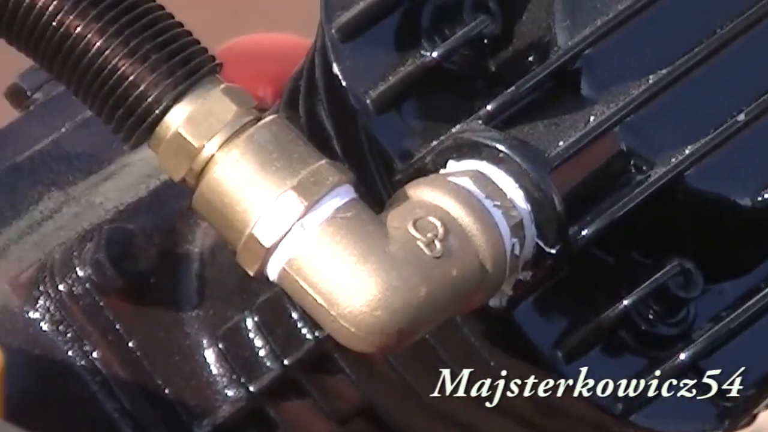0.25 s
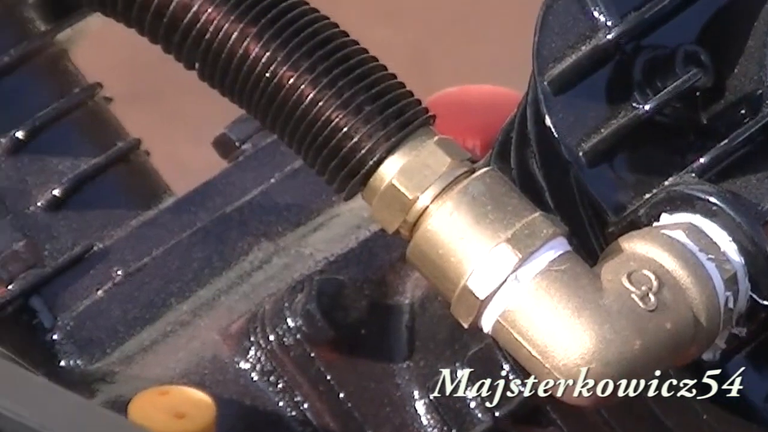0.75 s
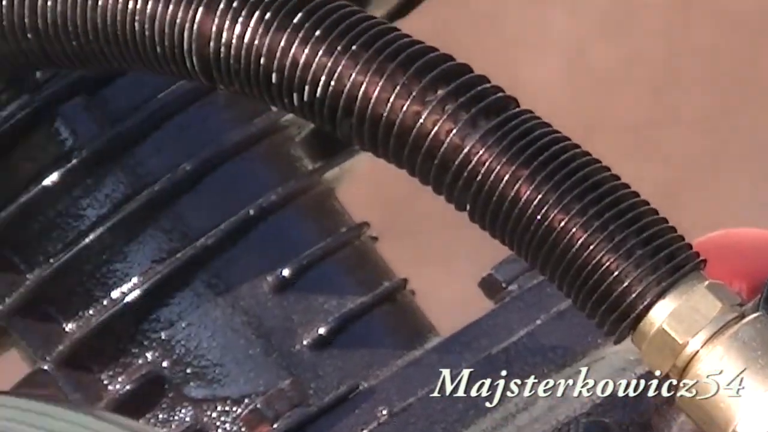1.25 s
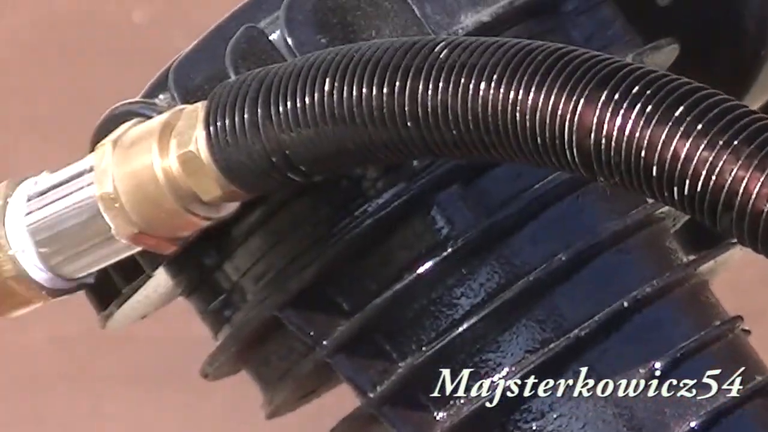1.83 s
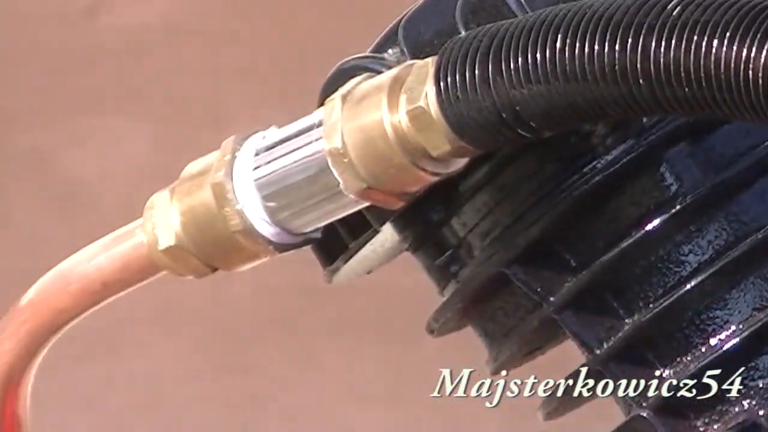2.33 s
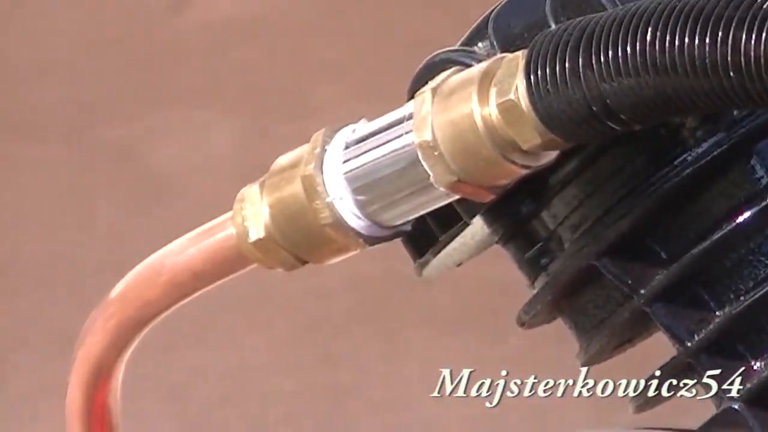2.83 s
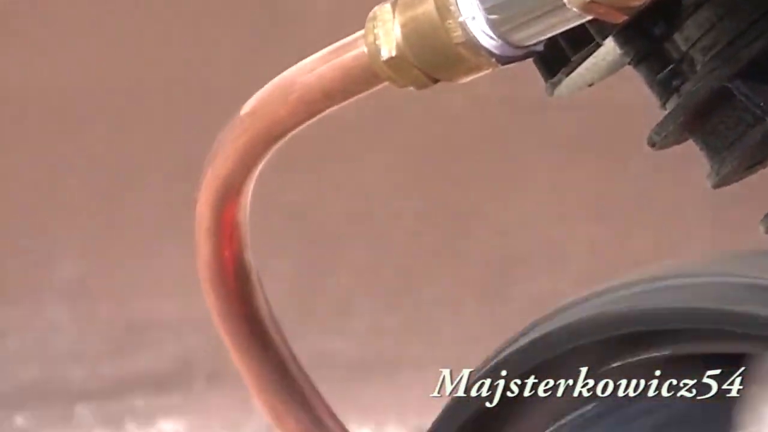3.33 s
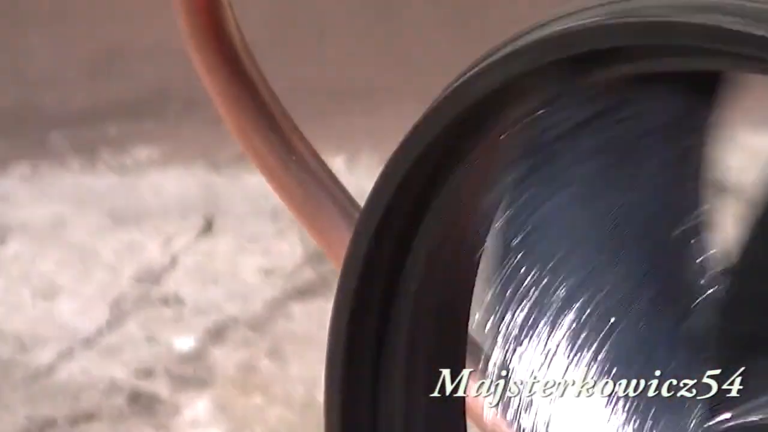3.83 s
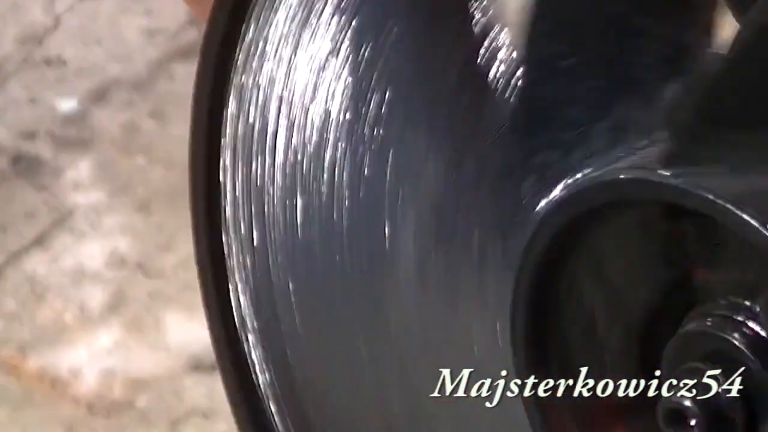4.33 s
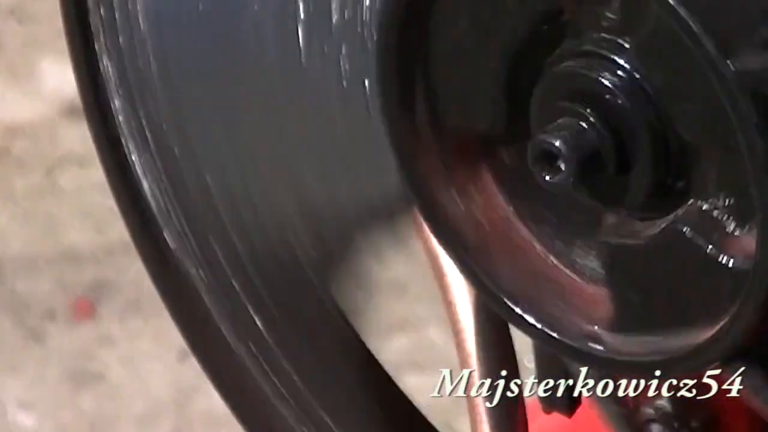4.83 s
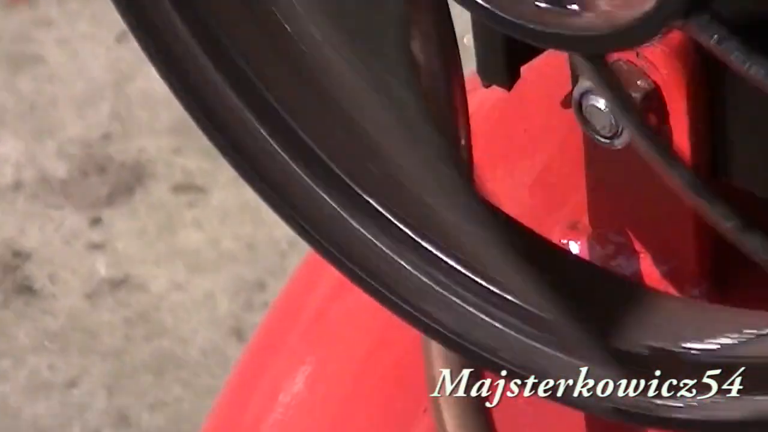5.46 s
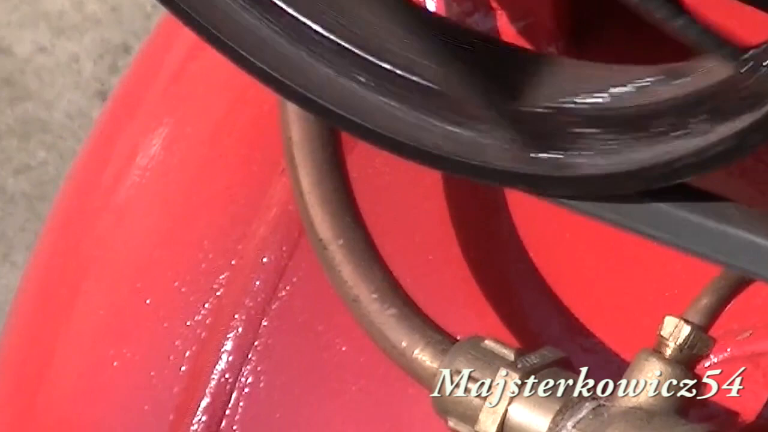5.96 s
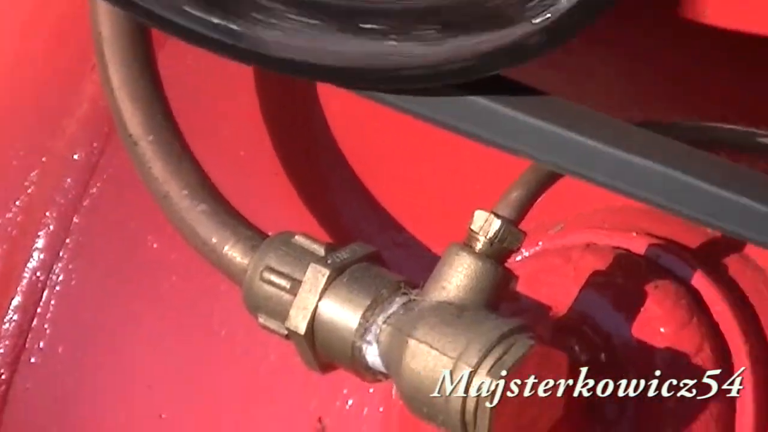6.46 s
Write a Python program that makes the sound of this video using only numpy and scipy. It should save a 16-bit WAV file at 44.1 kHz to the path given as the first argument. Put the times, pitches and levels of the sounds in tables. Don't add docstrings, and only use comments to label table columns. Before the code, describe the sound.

From 0 to about 6.7 seconds a belt-driven piston air compressor runs steadily, already at speed and never stopping. Nearly nineteen times a second the same uneven pattern recurs: clustered knocks ringing the cast body around 1 to 2 kHz, low intake thumps near 300 Hz, sharp reed ticks and snaps up near 10 kHz, and gritty puffs of air. They fuse into a rough, fast metallic rattle. Under it lie a broad fan and flywheel rush, a pulsing motor tone near 625 Hz, a low intake drone and a thin whine around 2 kHz. The first whine is strongest early, briefly thinning near 2.3, 3.9 and 5.5 seconds, as the close microphone moves from above to beside the pump, mostly between 3 and 4. Small level flinches come at 1.5, 2.1, 3.5 and 4.1-4.4 seconds. Outdoors, dry, level-controlled, slightly crunchy, dull above 12 kHz.

```python
import sys
import numpy as np
from scipy import signal
from scipy.fft import rfft, irfft, next_fast_len
from scipy.io import wavfile
from scipy.ndimage import uniform_filter1d, map_coordinates

SR = 44100
rng = np.random.default_rng(int(sys.argv[2]) if len(sys.argv) > 2 else 0)


def waveform_to_disk(signal):
    frames = np.transpose(np.atleast_2d(signal))
    scaled = np.clip(frames, -1, 1) * 32767
    samples = np.round(scaled).astype(np.int16)
    wavfile.write(sys.argv[1], SR, samples)


def invert_db(level):
    return 10 ** (np.asarray(level, dtype=float) / 20)


N = 295029

# t/s, speed/(turns per s)
CRANK_SPEED = [(0, 18.754), (.7, 18.7595), (1.5, 18.758), (3.5, 18.745), (6.7, 18.742)]
START_TURN, TURN_S = -.0154, 1 / 18.75
# t/s, position (0 above - 1 beside)
LISTENER_SIDE = [(0, 0), (1.5, 0.058), (3, 0.24), (4, 0.76), (5, 0.79), (6.7, 0.88)]

# f/Hz, level/dB
RUSH_SPECTRUM = [(15, -66), (25, -33), (160, -29.5), (296, -21.5), (459, -16.5), (564, -23), (625, -9.5),
                 (768, -14), (1190, -11), (1460, -16.5), (2100, -7.5), (5430, -20.5), (7990, -31.5),
                 (9570, -32.5), (11800, -41), (15300, -82), (22000, -120)]
# f/Hz, level/dB
SHAFT_TONES = [(417, -57.5), (437, -50), (526, -47.5), (550, -59), (573, -46.5), (598, -49), (650, -54),
               (663, -51.5), (697, -49.5), (725, -48.5)]
FAN_ORDER, FAN_DB = 33.375, -32

FIN_ORDERS = [109, 117, 103]
# level above/dB, level beside/dB, phase/rad
FIN_LEVELS = [(-38.5, -48, 3.14), (-56, -43, 1.5), (-54, -41, 1.5)]
QUIET_TIMES = [0, 2.32, 3.9, 5.55]
QUIET_S, QUIET_DB = 0.1, -12

# t into the turn/s, level/dB
INTAKE_THUMPS = [
    (0.00932, 0.9),
    (0.04947, -3.8),
    (0.0282, -12.4),
    (0.04296, -9.5),
]
# f/Hz, width/Hz, level above/dB, level beside/dB
HOUSING_MODES = [(240, 100, -9.8, -10.6), (294, 59, 0.0, -0.7), (377, 100, -3.2, -4.6)]
DRONE_ORDER = 13

# t into the turn/s, level/dB
REED_SNAPS = [
    (.0343, 1.5),
    (.0395, -9),
    (0.032, -1),
    (0.056, -6),
    (.0001, -7),
]
# t into the turn/s, level/dB
SEAT_TICKS = [(0.03308, -4.7), (0.03512, -5.6), (0.03539, -7.8), (0.03927, -7.4), (0.04321, -10.1),
              (0.04747, -2.0), (0.04878, 2.0), (0.0502, 1.2), (0.05184, -7.6), (-0.00018, -9.6),
              (0.00343, -8.3), (0.00832, -7.5)]
# t into the turn/s, level/dB
REED_OPENINGS = [(.0338, -10), (.0398, -9), (.0476, -2), (.0490, .5), (.0503, 1), (.0517, -3), (.0003, -4),
                 (.0036, -3), (.0078, -5), (.0120, -6), (.0165, -6), (.0202, -4)]
# f/Hz, width/Hz, level/dB
PLATE_MODES = [(6688, 45, -3), (7335, 140, -13), (8104, 56, -9), (8612, 56, -8), (8737, 120, -11),
               (9321, 80, -11), (9480, 30, -5), (9621, 80, -12), (9711, 35, 0), (9830, 50, -20),
               (9975, 28, -22), (10229, 165, -14)]
# f/Hz, width/Hz, level/dB
HEAD_MODES = [(2565, 50, -5), (2862, 60, -1.5), (3040, 55, -5), (3445, 60, -5), (3600, 130, -7),
              (3950, 90, -12), (4425, 120, -9), (4820, 100, -10), (5420, 280, -9)]
# f/Hz, level/dB
PUFF_SPECTRUM = [(880, -31), (1500, 8), (2120, -25), (2410, -19), (2940, 3), (3940, -5), (5420, -5.5),
                 (7840, -14.5), (9650, -19.5), (11800, -28), (15300, -69), (22000, -120)]

# t into the turn/s, level/dB
BODY_KNOCKS = [(0.00139, 2.4), (0.00483, 1.0), (0.00696, -0.0), (0.01103, -13.4), (0.01358, -18.0),
               (0.0168, -18.0), (0.02197, -6.7), (0.026, -2.4), (0.03288, -7.5), (0.03673, -2.1),
               (0.04054, -2.0), (0.04519, 2.8), (0.04856, -7.9)]
# f/Hz, width/Hz, level above/dB, level beside/dB
BODY_MODES = [(502, 10, -12.2, -10.9), (645, 37, -10.3, -10.5), (857, 66, -15.8, -18.1),
              (935, 30, -16.6, -17.7), (995, 11, -0.9, -8), (1034, 21, -6.1, -10.6), (1152, 27, -4.8, -4.4),
              (1198, 11, -0.4, -1.6), (1315, 45, -11.1, -11.9), (1363, 15, -0.6, 0.0),
              (1421, 24, -13.7, -18.1), (1507, 50, -16.4, -14.4), (1636, 18, -4.4, -5.0),
              (1814, 21, -14.1, -13.0), (1882, 30, -11.8, -10.6), (1947, 32, -13.6, -11.6),
              (1975, 13, -21.3, -15.6), (2038, 10, -12, -14), (2201, 28, -7.6, -6.5),
              (2277, 21, -12.6, -11.2), (2361, 11, -14.2, -13.9)]
# f/Hz, width/Hz, level/dB
FRAME_MODES = [(511.6, 22, -7.5), (634, 40, -7.5), (1002, 90, -9.5), (1135, 143, -7), (1380, 41, -2),
               (1650, 87, -8), (1862, 45, -3), (2044, 11.5, -3.5), (2210, 15, -12.5)]

# f/Hz, level under the mean/dB
TREBLE_GATE = [(7000, -8), (8300, -4.5), (9000, -5), (9400, -11), (10200, -6.5), (10700, -.5), (11000, 0),
               (11250, -2), (11600, 0), (11900, 2.5)]
# t/s, level/dB
LOUDNESS = [(0, -20), (1.3, -20.5), (2.2, -21), (3, -20), (3.6, -21.5), (4.4, -21.5), (5.2, -20.5),
            (6.7, -20.5)]
# t/s, level/dB
GAIN_DIPS = [
    (1.49, -2),
    (2.08, -2),
    (2.45, -1),
    (3.45, -1.5),
    (4.11, -2.5),
    (4.41, -2),
    (4.8, -1),
]
DIP_FALL_S, DIP_RISE_S = 0.015, 0.038
CEILING = .47


def unit(x):
    return x / np.sqrt(np.mean(x ** 2) + 1e-20)


def curves(rows):
    s, *cols = np.transpose(rows)
    return [np.interp(np.arange(N) / SR, s, c) for c in cols]


def wobble(rate):
    knots = rng.standard_normal(int(N * rate / SR) + 4)
    return map_coordinates(knots, [np.arange(N) * rate / SR])


def dips(rows, fall_s, rise_s):
    rows = np.array(rows)
    since = np.arange(N) / SR - rows[:, :1]
    width_s = np.where(since < 0, fall_s, rise_s)
    return rows[:, 1] @ np.exp(-(since / width_s) ** 2)


def filtered(x, response):
    m = next_fast_len(N + SR // 2)
    hz = np.fft.rfftfreq(m, 1 / SR) + 1e-3
    return irfft(rfft(x, m) * response(hz), m)[:N]


def band(x, low_hz, high_hz):
    return filtered(x, lambda f: 1 / (1 + (low_hz / f) ** 12) / (1 + (f / high_hz) ** 12))


def coloured(x, points):
    hz, db = np.transpose(points)
    return unit(filtered(x, lambda f: invert_db(np.interp(np.log(f), np.log(hz), db))))


def rung(x, modes):
    def response(f):
        total = 0
        for k, (centre, width, db) in enumerate(modes):
            resonance = 1j * f * width / (centre * centre - f * f + 1j * f * width)
            total = total + (-1) ** k * invert_db(db) * resonance
        return total
    return unit(filtered(x, response))


def beside_share():
    return np.clip(curves(LISTENER_SIDE)[0], 0, 1)


def heard(x, modes):
    side = beside_share()
    above = rung(x, [(hz, width, db) for hz, width, db, _ in modes])
    beside = rung(x, [(hz, width, db) for hz, width, _, db in modes])
    return (1 - side) * above + side * beside


def crank():
    return START_TURN + np.cumsum(curves(CRANK_SPEED)[0]) / SR


def blows(places, jitter_us, scatter_db):
    into_s, db = np.transpose(places)
    turn = np.arange(-1, N / SR / TURN_S)[:, None] + into_s / TURN_S
    at = np.interp(turn, crank(), np.arange(N), -1e3, 2 * N)
    at = at + jitter_us * SR / 1e6 * rng.standard_normal(turn.shape)
    size = invert_db(db + scatter_db * rng.standard_normal(turn.shape))
    inside = (at >= 8) & (at < N - 9)
    near = np.floor(at[inside])[:, None] + np.arange(-7, 9)
    off = near - at[inside][:, None]
    shape = np.sinc(off) * np.cos(np.pi * off / 16) ** 2
    return np.bincount(near.astype(int).ravel(), (size[inside][:, None] * shape).ravel(), N)


def fading(x, t60):
    return signal.lfilter([1], [1, -invert_db(-60 / (t60 * SR))], x)


def fading_noise(x, t60):
    return fading(x, t60) * rng.standard_normal(N)


def cooling_air():
    return invert_db(-5.5 + 0.63 * wobble(9)) * coloured(rng.standard_normal(N), RUSH_SPECTRUM)


def motor():
    blade_hz = FAN_ORDER * curves(CRANK_SPEED)[0] + 1.36 * wobble(25)
    turn = np.exp(2j * np.pi * (crank() - .62))
    rock = 1 + .5 * turn + 0.076 / turn
    tone = np.real(rock * np.exp(2j * np.pi * np.cumsum(blade_hz) / SR))
    total = invert_db(FAN_DB + 23 + 1.7 * wobble(22)) * tone
    for hz, db in SHAFT_TONES:
        turns = np.cumsum(hz + 1.21 * wobble(8)) / SR
        total = total + invert_db(db + 24 + 3.1 * wobble(5)) * np.sin(2 * np.pi * turns)
    return total


def fins():
    side = beside_share()
    quiet_db = dips([(s, QUIET_DB) for s in QUIET_TIMES], QUIET_S, QUIET_S)
    total = 0
    for order, (above, beside, phase) in zip(FIN_ORDERS, FIN_LEVELS):
        db = (1 - side) * above + side * beside + 26.0 + 2.1 * wobble(14)
        if order == FIN_ORDERS[0]:
            db = db + quiet_db
        total = total + invert_db(db) * np.sin(2 * np.pi * order * crank() + phase + 0.27 * wobble(6))
    return total


def snaps():
    shut = blows(REED_SNAPS, jitter_us=60, scatter_db=1.5)
    return invert_db(-35.5) * unit(band(fading_noise(shut, t60=.012), 9900, 11000))


def intake():
    thumps = blows(INTAKE_THUMPS, jitter_us=50, scatter_db=1.2)
    gulps = band(heard(thumps, HOUSING_MODES), 200, 420)
    drone = invert_db(-29.0 + 1.5 * wobble(6)) * np.sin(2 * np.pi * DRONE_ORDER * crank() + 1.34)
    return invert_db(-22) * gulps + drone


def valves():
    ticks = blows(SEAT_TICKS, jitter_us=6, scatter_db=1.4)
    slaps = blows(REED_OPENINGS, jitter_us=35, scatter_db=1.5)
    rattle = fading_noise(slaps, t60=0.0029)
    spit = coloured(fading_noise(slaps, t60=0.0024), PUFF_SPECTRUM)
    puff = coloured(fading_noise(slaps, t60=.04), PUFF_SPECTRUM)
    plate = band(rung(ticks, PLATE_MODES), 6000, 10600)
    strike = invert_db(-0.5) * unit(slaps) + unit(rattle)
    head = band(invert_db(-11.0) * rung(strike, HEAD_MODES), 2180, 5950)
    return invert_db(-18.5) * plate + head + invert_db(-22.0) * spit + invert_db(-17.0) * puff


def body():
    knocks = blows(BODY_KNOCKS, jitter_us=12, scatter_db=1.38)
    casting = band(heard(knocks, BODY_MODES), 396, 2250)
    simmer = unit(3.0 + unit(fading(knocks, t60=0.032))) * rng.standard_normal(N)
    return invert_db(-4.5) * casting + invert_db(-9.5) * rung(simmer, FRAME_MODES)


def scene():
    background = cooling_air() + motor() + fins()
    pump = snaps() + intake() + valves() + body()
    return (background + pump)[None]


def treble_gate(x):
    hz, _, z = signal.stft(x, SR, nperseg=2048)
    bins = z[:-1]
    power = (abs(bins) ** 2).reshape(128, 8, -1).mean(axis=1)
    power = uniform_filter1d(np.repeat(power, 8, axis=0), size=2, axis=1)
    edge_hz, under_db = np.transpose(TREBLE_GATE)
    threshold_db = np.interp(hz[:-1], edge_hz, under_db, left=-99)
    least = invert_db(2 * threshold_db) * power.mean(axis=1)
    kept = bins * (power > least[:, None])
    return signal.istft(np.vstack([kept, z[-1:]]), SR, nperseg=2048)[1][:N]


def top_cut(x):
    return signal.sosfilt(signal.butter(12, 11910, fs=SR, output="sos"), x)


def record(dry):
    gain_db = curves(LOUDNESS)[0] + dips(GAIN_DIPS, DIP_FALL_S, DIP_RISE_S)
    level = treble_gate(dry[0])[None] * invert_db(gain_db)
    mix = level / (1 + abs(level / CEILING) ** 6) ** (1 / 6)
    return top_cut(mix)


dry = scene()
out = record(dry)
waveform_to_disk(out)
```